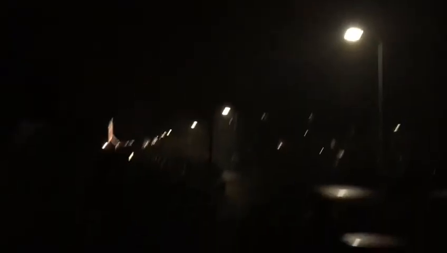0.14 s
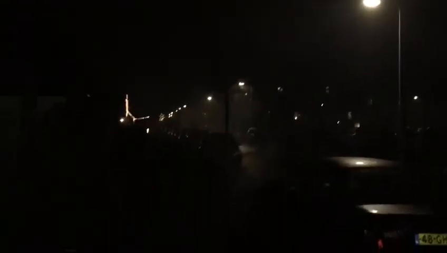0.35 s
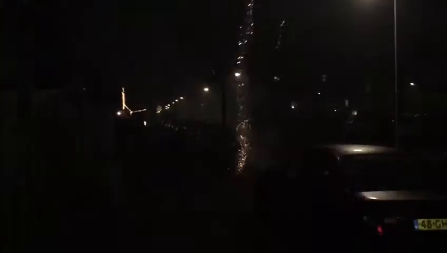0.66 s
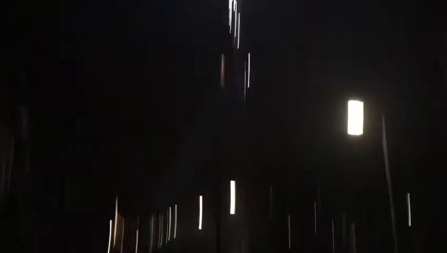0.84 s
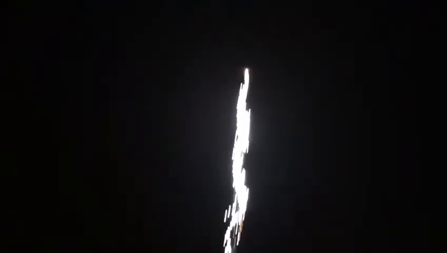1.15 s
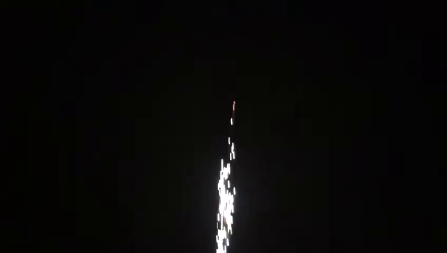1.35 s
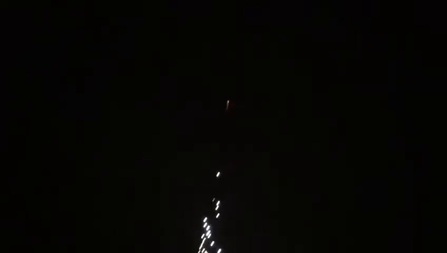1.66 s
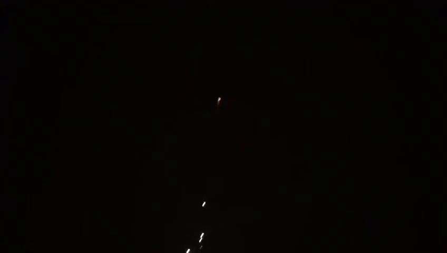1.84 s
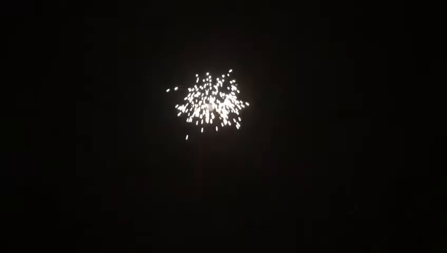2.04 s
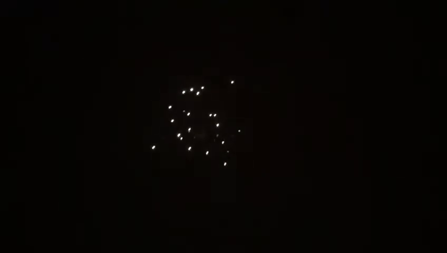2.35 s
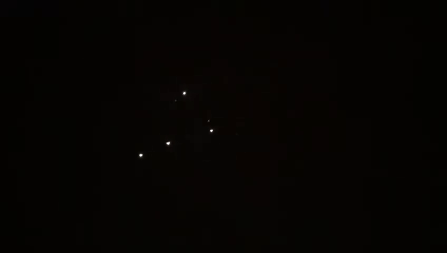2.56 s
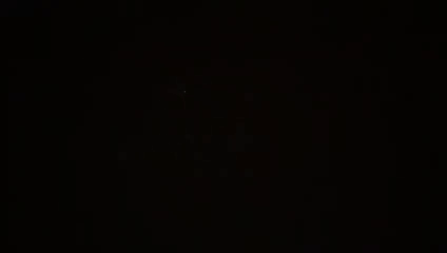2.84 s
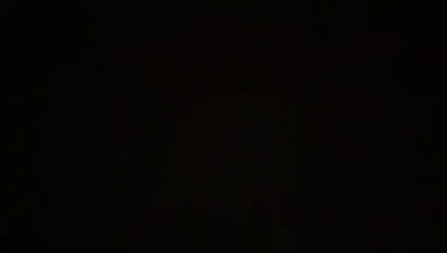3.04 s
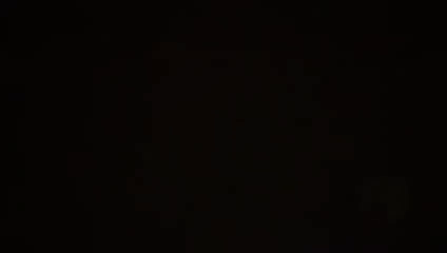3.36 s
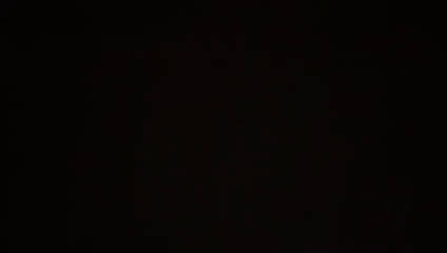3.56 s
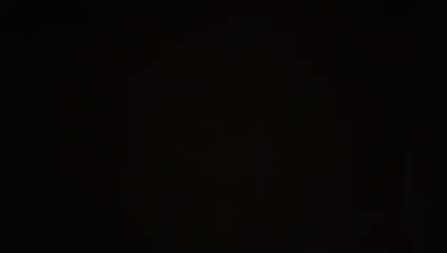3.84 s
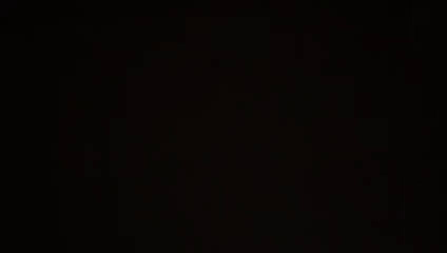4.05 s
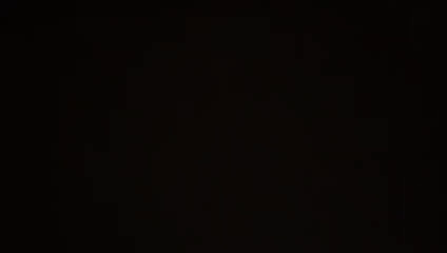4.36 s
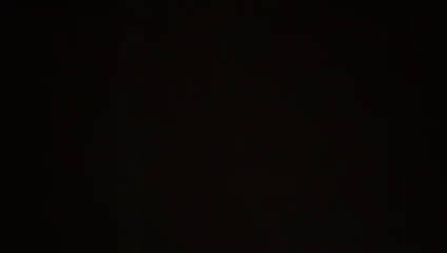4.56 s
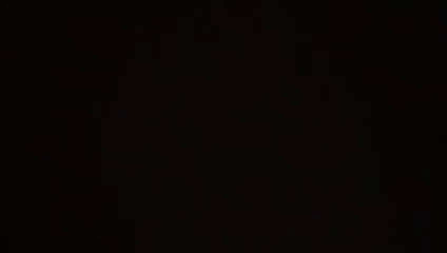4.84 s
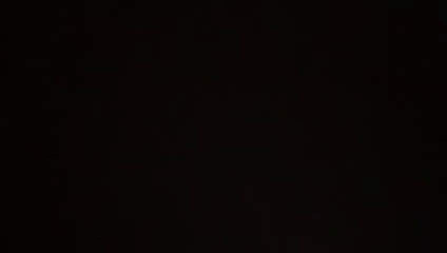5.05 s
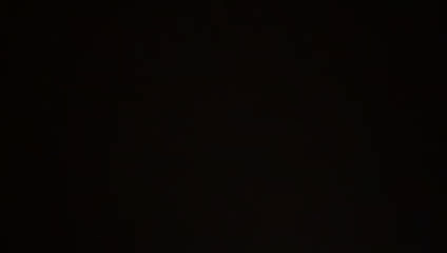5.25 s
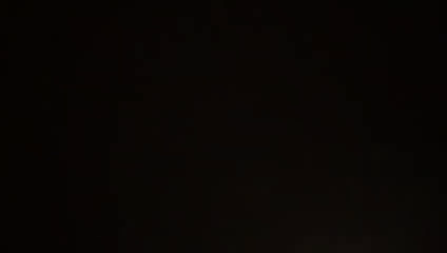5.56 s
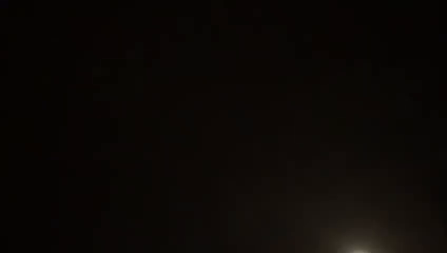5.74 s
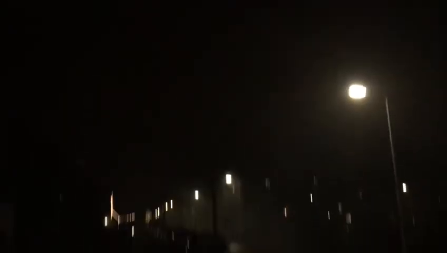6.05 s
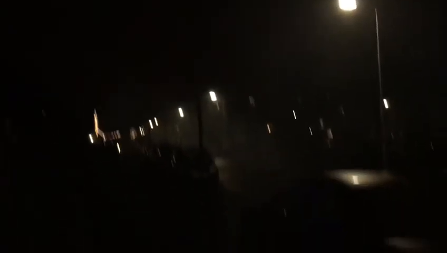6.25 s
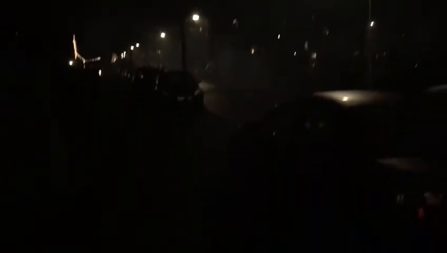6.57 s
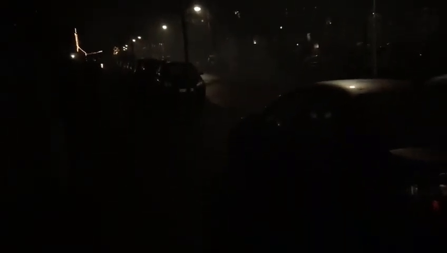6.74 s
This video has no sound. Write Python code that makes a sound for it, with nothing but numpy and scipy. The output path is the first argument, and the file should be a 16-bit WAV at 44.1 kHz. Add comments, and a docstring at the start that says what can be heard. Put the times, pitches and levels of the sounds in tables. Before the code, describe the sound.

On a quiet night street, wind rumbles on the microphone and a fuse hisses faintly. A close firework shot slams in, overloading the microphone, roaring between house fronts with a delayed slap from a distant building. Three more shots follow at intervals of over a second; after the second and third, dense clouds of sharp crackles burst overhead. The last bang's reverberation is still dying at the end.

```python
"""A residential street at night: a firework cake fires four shots, close enough to overload the microphone.
Each charge booms, a noise roar rattles between the house fronts and delayed slaps return from a far building.
After the second and third shots, clouds of crackling stars, made of many tiny shocks, go off overhead.
The fuse hisses faintly as noise in narrow bands, and gusts buffet the microphone with low, swinging pushes."""
import sys
import numpy as np
from scipy import signal
from scipy.fft import rfft, irfft
from scipy.io import wavfile

SR = 44100
rng = np.random.default_rng(int(sys.argv[2]) if len(sys.argv) > 2 else 0)


def dump(signal):
    """Clip the signal to [-1, 1] and save it as 16-bit WAV at the path in sys.argv[1]."""
    limited = np.clip(np.atleast_2d(signal).T, -1, 1)
    pcm = np.round(limited * 32767).astype(np.int16)
    wavfile.write(sys.argv[1], SR, pcm)


N = 304290
T = np.arange(N) / SR
AGE = T[:3 * SR]  # seconds since an event began
CUTOFF_HZ = 10300

# All levels are relative settings; spectra give the balance between pitches.
# Hum and hush of the night around the street: pitch_hz [Hz], level_db [dB per Hz]
NIGHT_SPECTRUM = [(120, -38), (200, 3.5), (411, 1.5), (740, -7), (1030, -5), (1240, -8), (2880, -20),
                  (3180, -19.5), (3890, -18.5), (5170, -42), (6220, -44), (9780, -26), (11000, -54),
                  (14300, -78), (22000, -120)]
# Strength of the wind at the microphone, as its rumble: time_s [s], level_db [dB]
WIND_COURSE = [(0.0, -59), (0.19, -42.5), (0.42, -34.5), (0.67, -52), (1.75, -45.5), (2.38, -37),
               (3.0, -38.5), (3.86, -30.5), (4.32, -32.5), (4.8, -41.5), (5.21, -42.5), (5.82, -48.5),
               (6.19, -36.5), (6.47, -41), (6.75, -28.5), (6.9, -30)]
# Low turbulence of the wind: pitch_hz [Hz], level_db [dB per Hz]
RUMBLE_SPECTRUM = [(20, -33), (45, -1), (85, 3.5), (140, -6.5), (220, -15.5), (400, -40.5), (1000, -75)]
# Hardest buffets of air on the microphone: strike_s [s], level_db [dB], upper_edge_hz [Hz]
BUFFETS = [(0.281, -27, 430), (0.316, -25.5, 420), (0.6, -35, 108), (0.908, -36, 116), (1.813, -31, 109),
           (2.236, -29.5, 125), (2.521, -25, 167), (2.977, -24, 380), (3.465, -27, 250), (3.579, -25, 300),
           (3.622, -15.5, 750), (3.64, -17.5, 330), (3.718, -29, 450), (3.961, -18, 480), (4.005, -22, 230),
           (4.045, -19.5, 290), (4.602, -28.5, 300), (5.183, -19, 381.6), (5.192, -20.5, 170),
           (5.663, -33, 460)]
# Course of the fuse's hiss: time_s [s], level_db [dB], tilt_db [dB per octave]
FUSE_COURSE = [(0, -63, -8), (.75, -61, -3), (.92, -62, 0), (1.05, -67, 0), (1.18, -62, 10),
               (1.32, -60, 12), (1.45, -80, 0)]
# Whistles of the fuse: pitch_hz [Hz], width_hz [Hz], level_db [dB]
WHISTLES = [(3250, 250, -2), (4350, 450, -1), (5300, 450, 1)]
# Soft rush of the burning fountain: time_s [s], level_db [dB]
FOUNTAIN_COURSE = [(.4, -79), (.85, -69), (.95, -50.5), (1.04, -73), (1.4, -64)]
# Clouds of stars lit together, popping around a common burn time:
# middle_s [s], length_s [s], middle_rate [pops per s], typical_level_db [dB]
STAR_CLOUDS = [(3.135, .22, 1100, -12.5), (3.33, .36, 280, -10), (4.861, .1, 460, -19),
               (4.947, .14, 750, -12), (5.059, .06, 200, -17)]
# Stars that crack out above the rest, before the common lag and lift: start_s [s], level_db [dB]
CRACKS = [(3.041, -9), (3.0859, -7), (3.1482, -2), (3.2465, -6), (3.2924, -4), (3.3214, -4), (3.3588, -1),
          (3.3842, -4), (3.3932, -2), (3.4216, -4), (3.454, -5), (3.4815, -7), (4.8254, -13), (4.8424, -9),
          (4.8868, -10), (4.9437, -5), (4.9634, -6), (4.9864, -7), (5.034, -4), (5.0534, -3), (5.0684, -6)]
# Shell bursting overhead: start_s [s], level_db [dB]
BURSTS = [(3.15, -3.5)]
# Colour of a blast up close: pitch_hz [Hz], level_db [dB per Hz]
BLAST_SPECTRUM = [(40, -1), (150, 17.5), (330, 5), (600, 1.5), (1100, 4), (1400, 0), (2100, 4),
                  (2800, -5.5), (4200, -6), (6000, -7.5), (10000, -13.5)]
# Colour of the sound between the house fronts: pitch_hz [Hz], level_db [dB per Hz]
CANYON_SPECTRUM = [(40, -49), (170, 11), (330, 3), (550, 6.5), (1100, 1), (2100, 4), (2900, -4), (4200, -5),
                   (6000, -9.5), (10000, -15)]
# Far reverberation: pitch_hz [Hz], level_db [dB per Hz], t60_s [s]
DISTRICT = [(40, -31, 1.2), (170, 9.5, 2.76), (506, 0, 4.6), (1030, -2, 4.05), (1900, 0.5, 3.06),
            (3000, -3.5, 2.55), (4260, -5, 1.88), (6670, -7.5, 1.44), (10000, -11.5, 0.48)]
# Echoes off house fronts and far blocks:
# delay_s [s], slap_db [dB], scatter_db [dB], scatter_decay_s [s], upper_edge_hz [Hz]
ECHOES = [(0.054, -6.5, -47, 0.0051, 7000), (0.075, -42, -27.5, 0.022, 7540), (.225, -47, -31, 0.1, 3950),
          (0.553, -16.5, -24.5, 0.014, 3200), (.575, -38, -29, .06, 3000), (.715, -64, -38.5, 0.089, 2780)]
# Shots of the cake: start_s [s], blast_db [dB], hollow_db [dB, low-mid ring, 0 leaves it unchanged],
# flutter_db [dB, before the blast], tail_db [dB, street tail], roar_lag_s [s]
SHOTS = [(1.4006, 3.5, -2.5, -23, -2.5, 0.00092), (2.649, 1, 7.5, -6, 0, 0.0064),
         (4.4713, -2, 9.5, -3, 0.5, .008), (6.086, 3.5, 2.5, -15, -2.5, 0.0011)]

# An eddy with this upper edge has this length; smaller eddies reach higher and pass sooner.
EDDY_S, EDDY_HZ, EDDY_SHRINK = .0085, 300, 0.61
SMALL_EDDIES_PER_S, SMALL_EDDY_HZ = 5, 161.7
SMALL_EDDY_DB = 4.5  # above the wind
CRACK_DB, CRACK_LAG_S = 4.5, .0012
STAR_SPREAD_DB, STAR_LARGEST_DB = 6, 6


def from_db(db):
    """Amplitude factor of a level in dB."""
    return 10 ** (np.asarray(db) / 20)


def rms_one(x):
    """Scale a sound to rms 1."""
    return x / np.sqrt(np.mean(x ** 2) + 1e-20)


def at_hz(rows, hz, axis=1):
    """Read a table column at a pitch, interpolated over log frequency."""
    table = np.array(rows)
    return np.interp(np.log(hz), np.log(table[:, 0]), table[:, axis])


def cut(x, hz, kind, order=2):
    """Butterworth filter: low, high or band."""
    sos = signal.butter(order, np.clip(hz, 10, .45 * SR), kind, fs=SR, output="sos")
    return signal.sosfilt(sos, x + 1e-18)


def add(out, s, x):
    """Mix x into out from time s on."""
    i = max(round(s * SR), 0)
    out[i:i + len(x)] += x[:len(out) - i]


def resonance(x, hz, width_hz):
    """A two-pole resonator rings at one pitch; a narrower width rings longer."""
    r = np.exp(-np.pi * width_hz / SR)
    feedback = [1, -2 * r * np.cos(2 * np.pi * hz / SR), r * r]
    return signal.lfilter(np.array([1, 0, -1]) * (1 - r * r) / 2, feedback, x)


def coloured(spectrum, size):
    """Noise of a given spectrum, rms 1."""
    hz = np.fft.rfftfreq(size, 1 / SR) + 1
    bins = rfft(rng.standard_normal(size)) * from_db(at_hz(spectrum, hz))
    return rms_one(irfft(bins * (hz < CUTOFF_HZ + 1000), size))


def grain(spread_db, per_s, size):
    """A gain that wanders at random, so that single moments stand out of the mass; rms 1."""
    wander = np.interp(T[:size] * per_s, np.arange(size), rng.standard_normal(size))
    return rms_one(from_db(spread_db * wander))


def district_tail(swell_s):
    """Scatter from distant houses builds up, then dies band by band; the air takes the treble soonest."""
    edges = np.geomspace(35, 12000, 19)
    white = rng.standard_normal((2, len(AGE)))
    steady, dying = 0, 0
    for k, (low, high) in enumerate(zip(edges, edges[1:])):
        hz = np.sqrt(low * high)
        # neighbouring bands draw on different noise
        band = cut(white[k % 2], [low, high], "band") * from_db(at_hz(DISTRICT, hz))
        steady = steady + band
        dying = dying + band * from_db(-60 * AGE / at_hz(DISTRICT, hz, axis=2))
    swell = 1 - np.exp(-AGE / swell_s)
    return dying / np.std(steady) * swell * grain(0.14, 28.3, size=len(AGE))


def shock(low_hz, high_hz):
    """A steep pressure front, a deep underpressure and a small rebound; peak 1."""
    pulse = cut(signal.unit_impulse(1024), low_hz, "high")
    pulse = cut(pulse, high_hz, "low", order=1)
    pulse = signal.lfilter([.72, -1], [1, -.72], pulse)  # all-pass: shifts phase only
    pulse = cut(pulse, CUTOFF_HZ, "low", order=6)
    return pulse / np.abs(pulse).max()


def night():
    """The street's background: steady noise, weak in the treble."""
    return from_db(-52.0) * coloured(NIGHT_SPECTRUM, N)


def eddy(t, edge_hz):
    """An eddy strikes the microphone at t = 0 with quick swings that slow down as it passes."""
    length_s = EDDY_S * (EDDY_HZ / edge_hz) ** EDDY_SHRINK
    # the push fades more slowly than it rises
    shape = np.exp(-np.abs(t / length_s) ** 1.5 / np.where(t < 0, 1, 2))
    swing_hz = .38 * edge_hz * 2 ** (-.6 * np.clip(t / length_s, -.7, 1.5))
    swing = np.sin(2 * np.pi * (np.cumsum(swing_hz) / SR + rng.random()))
    churn = cut(rng.standard_normal(len(t)), edge_hz, "low", order=5)
    churn = rms_one(cut(churn, 0.33 * edge_hz, "high"))
    push = (swing + churn) * shape
    return push * from_db(4.5) * np.linalg.norm(shape) / np.linalg.norm(push)


def wind():
    """Low turbulence, random small eddies whose level follows the wind, and a few hard buffets."""
    lumps = grain(3.5, 22, size=N)
    wind_db = np.interp(T, *np.transpose(WIND_COURSE))
    out = from_db(wind_db) * coloured(RUMBLE_SPECTRUM, N) * lumps
    small_eddies = []
    for i in np.flatnonzero(rng.random(N) < SMALL_EDDIES_PER_S / SR):
        edge_hz = SMALL_EDDY_HZ * 2 ** rng.uniform(-0.512, 0.28)
        small_eddies.append((T[i], wind_db[i] + SMALL_EDDY_DB, edge_hz))
    t = T[:SR // 2] - 1 / 4  # from 1/4 s before the strike to 1/4 s after
    for strike_s, level_db, edge_hz in list(BUFFETS) + small_eddies:
        out += from_db(level_db) * np.interp(T - strike_s, t, eddy(t, edge_hz), 0, 0)
    return out


def fuse():
    """A thin jet of gas whistles in the tubes: one noise rings in several bands."""
    jet = rng.standard_normal(N)
    time_s, level_db, tilt_db = np.transpose(FUSE_COURSE)
    hiss = np.zeros(N)
    for hz, width_hz, whistle_db in WHISTLES:
        # the tilt pivots around 4300 Hz
        course_db = np.interp(T, time_s, level_db + tilt_db * np.log2(hz / 4300))
        hiss += from_db(whistle_db + course_db) * rms_one(resonance(jet, hz, width_hz)) / 2
    return hiss


def fountain():
    """Sparks rush out as soft noise of changing level."""
    return from_db(np.interp(T, *np.transpose(FOUNTAIN_COURSE))) * coloured(CANYON_SPECTRUM, N)


def pops():
    """Every star pops with one tiny shock, its pitch set by its size; each cloud thickens and thins."""
    out = np.zeros(N)
    crack_sizes = from_db(rng.normal(0, 1, len(CRACKS)))
    for (start_s, level_db), size in zip(CRACKS, crack_sizes):
        crack = from_db(level_db + CRACK_DB) * shock(650 * size, 3000 * size)
        add(out, start_s + CRACK_LAG_S, crack)
    strengths = from_db(np.minimum(rng.normal(0, STAR_SPREAD_DB, N), STAR_LARGEST_DB))
    strengths *= rng.choice([-1, 1], N)
    clicks = np.zeros(N)
    for middle_s, length_s, middle_rate, level_db in STAR_CLOUDS:
        # bell-shaped rate, zero outside the cloud
        rate = middle_rate * np.cos(np.pi * np.clip((T - middle_s) / length_s, -.5, .5)) ** 2
        clicks += (rng.random(N) < rate / SR) * strengths * from_db(level_db)
    size_class = rng.integers(0, 6, N)
    for k, size in enumerate(np.geomspace(.6, 1.5, 6)):
        out += signal.oaconvolve(clicks * (size_class == k), shock(900 * size, 3600 * size))[:N]
    return out


def stars():
    """A shell bursts among the popping stars; the street smears them into a wash by convolution."""
    out = pops()
    for start_s, level_db in BURSTS:
        burst = cut(coloured(CANYON_SPECTRUM, len(AGE)), 2800, "low", order=1)
        add(out, start_s, from_db(level_db) * burst * np.exp(-AGE / .006))
    reflections = grain(5.0, 700, size=len(AGE))
    near = rng.standard_normal(len(AGE)) * reflections * from_db(-60 * AGE / 0.28)
    near = cut(near, 10000, "low", order=1)
    far = district_tail(swell_s=0.13)
    # overhead, no ground soaks up the treble
    far = far + from_db(9) * cut(far, 6000, "high", order=1)
    street = from_db(-9) * near / np.linalg.norm(near)
    street += from_db(-15) * far / np.linalg.norm(far)
    return out + signal.oaconvolve(out, street)[:N]


def flutter(lead_s, ring_hz, ring_db):
    """A hollow flutter and a thin ring swell just ahead of the bang."""
    hollow = cut(rng.standard_normal(len(AGE)), 694, "low", order=6)
    hollow = rms_one(cut(hollow, 230, "high"))
    ring = from_db(ring_db) * np.sin(2 * np.pi * ring_hz * AGE)
    swell = np.minimum(AGE / lead_s, 1) ** 1.5
    return (hollow + ring) * swell * np.exp(-(AGE / (lead_s + .006)) ** 8)


def boom(rest_hz, glide_hz, glide_s):
    """The deep pressure wave swings for about two cycles and slows as it goes."""
    turns = rest_hz * AGE + glide_hz * glide_s * (1 - np.exp(-AGE / glide_s))
    envelope = (1 - np.exp(-AGE / .002)) * np.exp(-(AGE / .029) ** 4)
    return .72 * np.sin(2 * np.pi * turns) * envelope


def echoes():
    """Each wall returns a slap and a dull smear of scatter."""
    out, size = np.zeros(len(AGE)), len(AGE)
    for delay_s, slap_db, scatter_db, decay_s, edge_hz in ECHOES:
        echo = from_db(scatter_db) * coloured(CANYON_SPECTRUM, size) * np.exp(-AGE / decay_s)
        add(echo, 0, from_db(slap_db) * shock(650, 3000))
        echo += from_db(slap_db - 5) * coloured(CANYON_SPECTRUM, size) * np.exp(-AGE / .002)
        add(out, delay_s, cut(cut(echo, 630, "high"), edge_hz, "low"))
    return out


def roar(blast_db, hollow_db, tail_db):
    """A dense volley, a roar between the house fronts and the far tail, with a hollow resonance."""
    size = len(AGE)
    # volley off parked cars and fences
    volley = coloured(BLAST_SPECTRUM, size) * grain(2.8, 450, size=size)
    volley *= from_db(-12.5) * (1 - np.exp(-AGE / 0.0015)) * np.exp(-(AGE / 0.032) ** 4)
    # the roar runs to and fro between the house fronts
    canyon = coloured(CANYON_SPECTRUM, size) * grain(2.2, 250, size=size)
    canyon *= from_db(-17.5 - 60 * AGE / 0.44) * (1 - np.exp(-AGE / 0.0016))
    air = from_db(blast_db) * (volley + canyon)
    air += from_db(tail_db - 26.5) * district_tail(swell_s=0.3)
    return air + (from_db(hollow_db) - 1) * resonance(air, 480, 560)


def shots():
    """Hollow flutter, shock front, boom and roar, then the street answers."""
    out, size = np.zeros(N), len(AGE)
    lead_s = .0215
    for start_s, blast_db, hollow_db, flutter_db, tail_db, lag_s in SHOTS:
        add(out, start_s - lead_s, from_db(flutter_db) * flutter(lead_s, ring_hz=3120, ring_db=-22))
        # faint noise starts with the flutter, ahead of the bang
        soft_noise = from_db(-39.0) * coloured(BLAST_SPECTRUM, size) * np.exp(-AGE / 0.018)
        add(out, start_s - lead_s, soft_noise)
        # noisy front, then the sharp shock
        front = from_db(blast_db - 4) * coloured(BLAST_SPECTRUM, size) * np.exp(-AGE / .0016)
        add(out, start_s - .001, front)
        add(out, start_s + lag_s + .002, from_db(blast_db + 2) * shock(450, 3000))
        add(out, start_s, boom(rest_hz=52.3, glide_hz=56.7, glide_s=0.004))
        add(out, start_s + lag_s, roar(blast_db, hollow_db, tail_db))
        add(out, start_s, echoes())
    return out


def scene():
    """The street from its background to the shots, on one channel."""
    return (night() + wind() + fuse() + fountain() + stars() + shots())[None]


def record(dry):
    """The microphone overloads on the blasts, bending peaks softly towards 0.8; the top is cut."""
    pressed = dry / (1 + (dry / .8) ** 4) ** (1 / 4)
    return signal.sosfiltfilt(signal.butter(16, CUTOFF_HZ + 200, fs=SR, output="sos"), pressed)


dry = scene()
out = record(dry)
dump(out)
```